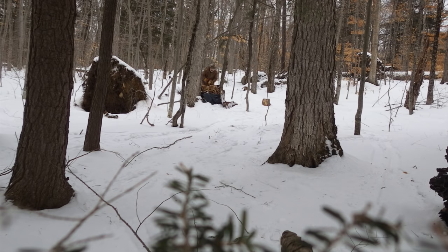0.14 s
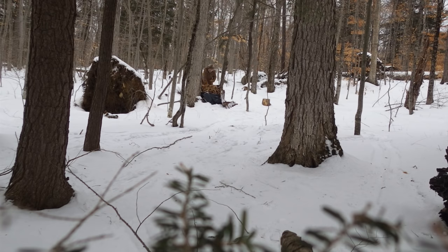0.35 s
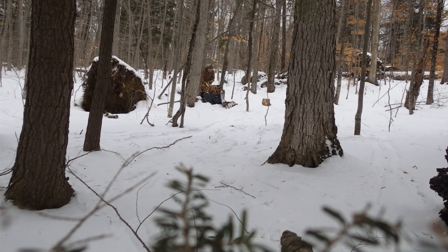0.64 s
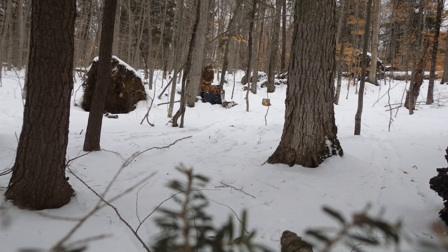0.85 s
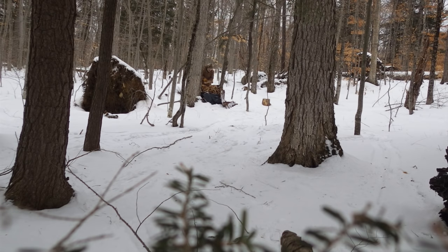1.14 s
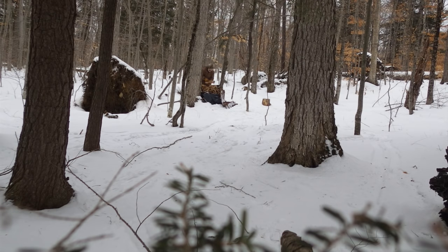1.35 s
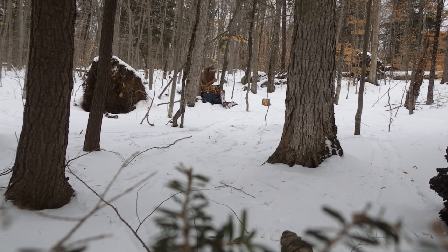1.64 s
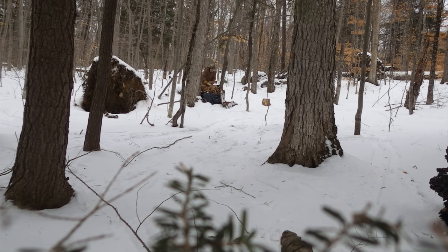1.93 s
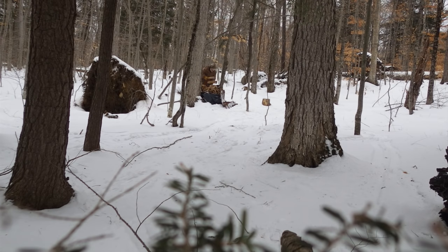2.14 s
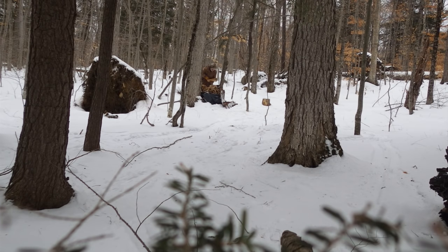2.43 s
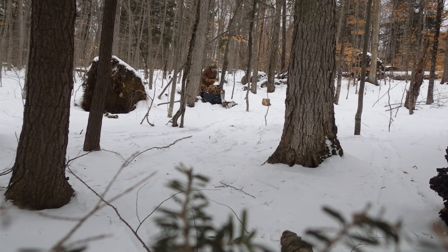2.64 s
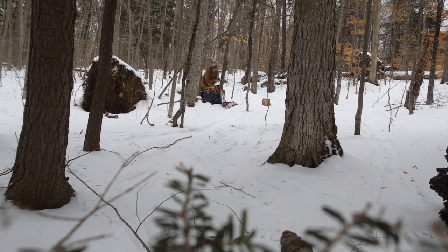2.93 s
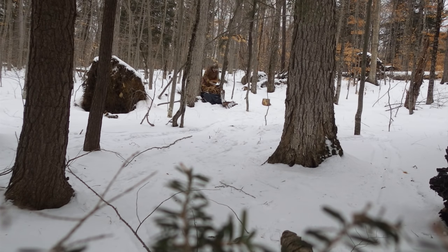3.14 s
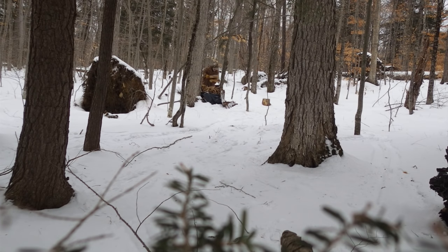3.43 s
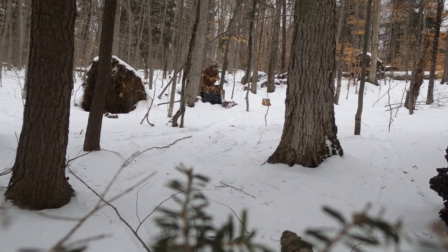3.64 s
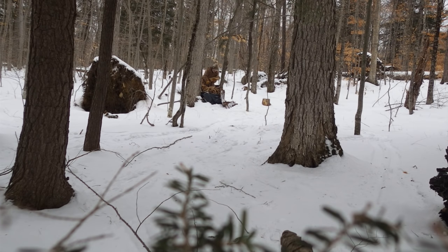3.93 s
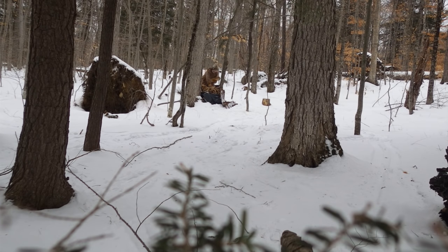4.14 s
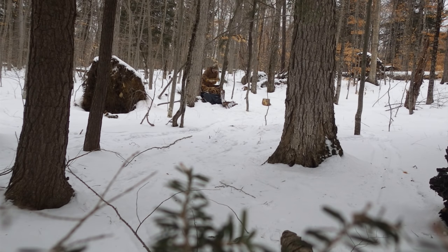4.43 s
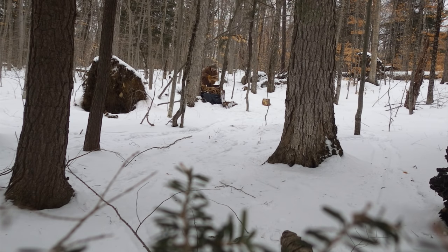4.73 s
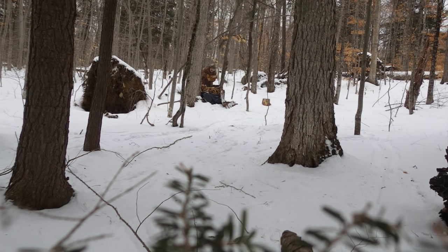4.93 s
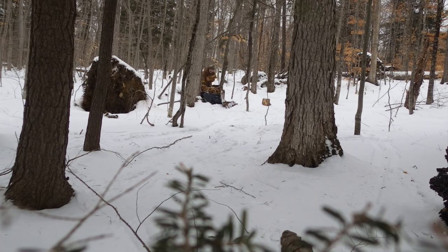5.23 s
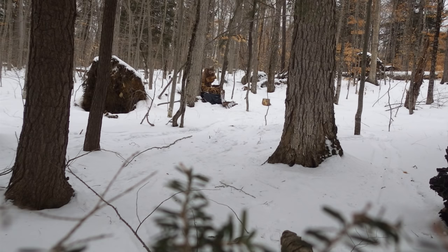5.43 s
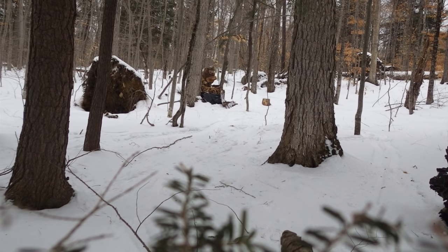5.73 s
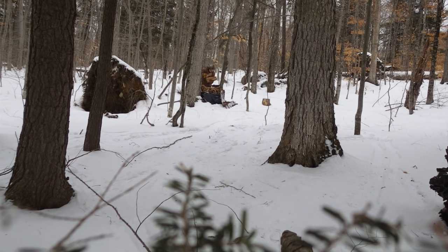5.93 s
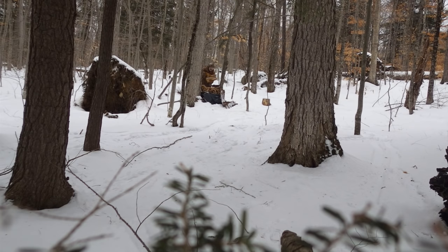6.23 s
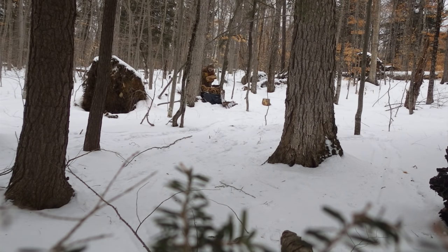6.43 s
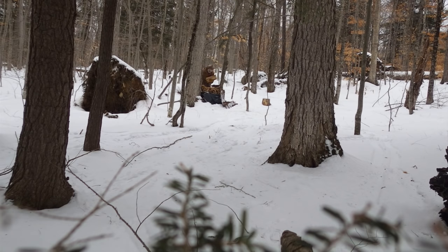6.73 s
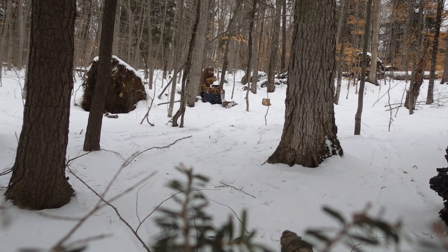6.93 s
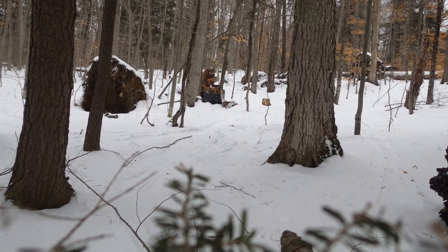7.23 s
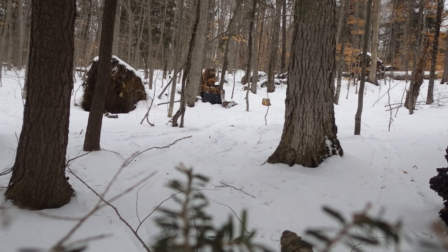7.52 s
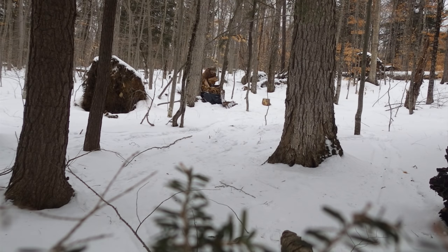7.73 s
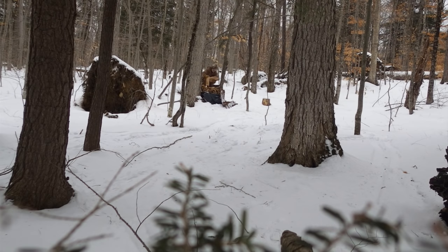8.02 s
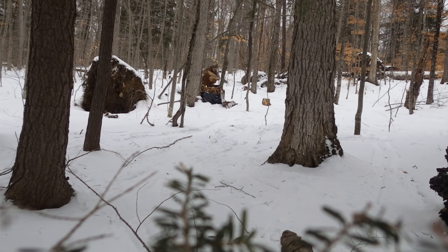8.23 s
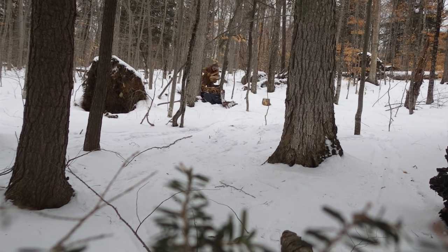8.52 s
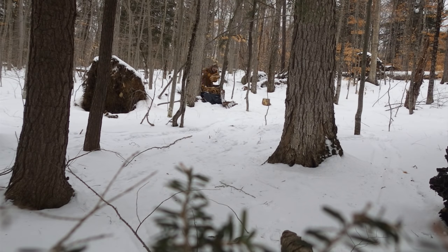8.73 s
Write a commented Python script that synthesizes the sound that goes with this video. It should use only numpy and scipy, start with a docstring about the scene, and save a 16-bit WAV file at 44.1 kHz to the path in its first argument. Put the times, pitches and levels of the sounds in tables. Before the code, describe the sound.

Pieces of split firewood are stacked some way off in a still, snowy wood. They land with irregular knocks and clunks, sometimes singly, sometimes in quick rattling clusters, with soft scrapes and small crunches of bark and snow between. One early clunk is much louder than the rest. Each leaves a thin echo among the trees, over faint air, microphone hiss and a few tiny distant pips.

```python
"""Clunks of split firewood being stacked, some way off in a still, snowy wood.
Each billet rings in two bending modes, rattles the pile and cracks its bark; between blows, logs
scrape and snow crunches. Trunks scatter these sounds into a long thin tail. Behind them: a few far
pips, faint air and the hiss of a microphone with narrow notches."""
import sys
import numpy as np
from scipy import signal
from scipy.fft import rfft, irfft
from scipy.io import wavfile

SR = 44100
rng = np.random.default_rng(int(sys.argv[2]) if len(sys.argv) > 2 else 0)


def output_pcm(signal):
    """Save a mono or channel-first signal as 16-bit PCM at the path in sys.argv[1].

    Samples are clipped to [-1, 1] before scaling.
    """
    pcm = np.clip(np.atleast_2d(signal).T, -1, 1) * 32767
    wavfile.write(sys.argv[1], SR, np.round(pcm).astype(np.int16))


N = 391166
HIT_S = 0.25

# bending modes by billet name, unrelated as a split log is not round: low_hz, high_hz
BILLET_MODES = {"thick": (258, 525), "flat": (717, 1380), "heavy": (765, 1245), "stout": (793, 1362),
                "long": (815, 1382), "medium": (972, 1300), "slim": (920, 1408), "short": (1070, 1406),
                "square": (920, 1120)}
# bark and ice breaking: freq_hz, gain_db
CRACK_SPECTRUM = [(1000, -20), (2800, 0.5), (3800, -7), (5000, 3.5), (6000, 5.5), (7000, -6.5),
                  (9000, -18.5), (12000, -12)]


def stacking():
    """Billets land on the pile and slide home."""
    # start_s, billet, level_db, high_mode_db, crack_db, thud_db, t60_s
    landings = [(0.188, "short", -55.5, -3, -14, -7.5, 0.071), (0.7145, "long", -52.5, 20, -12, -18, 0.13),
                (0.745, "long", -48, 6, -12, -19, .1), (1.1355, "heavy", -35, -0.5, -13.5, -19.5, 0.12),
                (1.3851, "stout", -18.5, 8, -23, -20.5, 0.06), (1.394, "slim", -50, -3, -1, -19, .014),
                (2.102, "short", -50, 20, -20, -30, 0.02), (2.5967, "heavy", -34, -1.5, -20.5, -33, 0.066),
                (2.631, "square", -43, 2, -7, -26, 0.06), (2.652, "heavy", -49.5, -15, 4, -24.5, 0.057),
                (2.752, "square", -51.5, 5, -11, -20, 0.1), (2.79, "square", -55, 10, -18, -24, 0.12),
                (2.848, "short", -64, 9, -17, -21, 0.018), (3.221, "slim", -55.5, 10, -11, -25, .07),
                (3.8707, "long", -46.5, -1, -5, -36, 0.095), (3.9375, "medium", -49, -12, -7.5, -6, .036),
                (3.96, "short", -52, 11, -11, -23, 0.03), (3.984, "short", -35.5, 20, -12.5, -25.5, 0.029),
                (4.369, "long", -54, -24, 3.5, 4, 0.0099), (4.4988, "long", -45, 25, -37, -33, 0.086),
                (5.003, "long", -47.5, -3, -9, 0, 0.13), (5.0358, "heavy", -31, -7, -25, -9.5, 0.02),
                (5.1175, "square", -47, -3, -17.5, -10, 0.05),
                (5.209, "medium", -37.5, -2.5, -20, -12.5, 0.012),
                (5.221, "square", -49, 13, -6, -25, 0.046), (5.8455, "slim", -51, -3, -19, -22, .033),
                (6.041, "heavy", -46, 1.5, -19, -24, 0.092), (6.518, "heavy", -34, -11, -16, -11.5, 0.055),
                (6.5225, "medium", -29, -11, -14.5, -11.5, 0.077),
                (6.5465, "medium", -36, -11, -17, -14.5, 0.083),
                (6.574, "heavy", -40.5, -6, -32, -22, 0.066), (6.6139, "flat", -36, -4, -12, -7.5, .034),
                (6.713, "medium", -54.5, -2, -14, -8, 0.05), (7.651, "slim", -55.5, 15, -8, -13, 0.045),
                (7.671, "medium", -53.5, -1, -5, -11, 0.032), (7.905, "medium", -47.5, 2, -10, -21, 0.054),
                (7.9338, "slim", -43, 4.5, -28.5, -25, 0.027),
                (8.018, "medium", -54.5, -15, -13, -18, .064), (8.114, "square", -44.5, 2, -11, -4.5, .11),
                (8.1155, "thick", -49, -5, -19.5, -11.5, 0.078), (8.789, "slim", -43, 7, -3.5, -13, 0.082),
                (8.8208, "long", -48.5, 0, -9.5, 0, 0.054)]
    track = np.zeros(N)
    for start_s, *blow in landings:
        add(track, start_s, knock(*blow))
    firm_blow_db = -45
    for start_s, _, level_db, *_, t60_s in landings:
        slide_db = -60.5 + 0.45 * (level_db - firm_blow_db)
        slide_s = 1.32 * t60_s  # a loose billet both rings and slides longer
        add(track, start_s, scrape(slide_s, wood_db=slide_db, crunch_db=slide_db - 11))
    return track


def knock(billet, level_db, high_mode_db, crack_db, thud_db, t60_s):
    """The push builds as bark crushes, then wood rings. High mode re low; crack and thud re level_db."""
    low_hz, high_hz = BILLET_MODES[billet]
    t = np.arange(int(HIT_S * SR)) / SR
    # more thud than crack: a softer, longer contact
    contact_s = np.clip(0.001973 * 2 ** ((thud_db - crack_db) / 17.5), 0.0003, 0.006)
    push = 1 - np.exp(-(t / contact_s) ** 2)
    # the pile soaks up most of the ring; a little lives on in the free ends
    free_ends = undb(-24) * fade(t, t60_s=0.067)
    low = push * (fade(t, t60_s) + free_ends) * np.sin(2 * np.pi * low_hz * t)
    high = push * (fade(t, 0.55 * t60_s) + free_ends) * np.sin(2 * np.pi * high_hz * t)
    ring = level(low, 0) + level(high, high_mode_db)
    rattle = push * fade(t, 3 * t60_s) * pile(t)  # a billet held fast damps the pile too
    rattle_db = 4 + 0.56 * crack_db  # rougher contact shakes it more
    # dull push into pile and ground: freq_hz, gain_db
    thud_spectrum = [(30, -26), (120, -12.5), (260, -8.5), (470, 5), (620, 1.5), (900, 5.5), (2000, -45.5)]
    thud = colour(signal.unit_impulse(len(t), int(contact_s * SR)), thud_spectrum)
    snap = (t >= contact_s) * fade(np.abs(t - contact_s), t60_s=0.005) * rng.standard_normal(len(t))
    crumbs = push * fade(t, t60_s) * grit(len(t), spread_db=3.5)
    crack = colour(level(snap, -3) + level(crumbs, 0), CRACK_SPECTRUM)
    return (level(ring, level_db) + level(rattle, level_db + rattle_db)
            + level(thud, level_db + thud_db) + level(crack, level_db + crack_db))


def pile(t):
    """The pile's ring, a little different at each point of contact."""
    # pitch_hz, t60_s, level_db
    modes = [(457, 0.0095, -9), (555, 0.024, -7), (715, 0.035, 2), (837, 0.036, 1), (988, 0.074, -1),
             (1100, 0.021, 5), (1269, 0.022, 7), (1402, 0.02, 6.5), (1740, 0.024, 4), (1905, 0.05, -5),
             (2287, 0.013, 2.5), (2393, 0.063, -14.5), (2840, 0.094, -14.5), (3130, 0.042, -1),
             (3495, 0.049, -14.5)]
    ring = np.zeros(len(t))
    for pitch_hz, t60_s, level_db in modes:
        detune, strength, phase = rng.uniform(-1, 1, 3)
        tone = np.sin(2 * np.pi * pitch_hz * (1 + 0.035 * detune) * t + np.pi * phase)
        ring += undb(level_db + 2.5 * strength) * fade(t, t60_s) * tone
    return ring


def dragging(bumps_per_s=11):
    """Logs drag over bark and snow, bumping their neighbours at uneven intervals."""
    # start_s, length_s, wood_db, crunch_db
    drags = [(0.725, 0.23, -60.5, -64), (1.097, 0.11, -55.5, -80), (1.719, 0.49, -69, -65),
             (2.029, 0.057, -55.5, -75), (3.04, .08, -56, -76), (3.267, 0.025, -59, -68),
             (3.508, 0.022, -62, -59.5), (3.616, 0.39, -83, -66), (3.925, 0.15, -56.5, -61),
             (4.322, 0.038, -55, -58), (4.468, 0.048, -54, -59.5), (5.033, 0.15, -56, -73),
             (5.748, .2, -52, -56), (5.996, 0.1, -57, -62), (6.502, 0.034, -50, -51),
             (7.587, 0.33, -61, -69), (8.04, 0.06, -61, -72), (8.769, 0.092, -51, -76)]
    track = np.zeros(N)
    for start_s, *drag in drags:
        add(track, start_s, scrape(*drag))
    neighbours = [name for name in BILLET_MODES if name != "thick"]
    for start_s, length_s, wood_db, _ in drags:
        count = int(length_s * bumps_per_s)
        for k, (jitter, strength, balance) in enumerate(rng.uniform(-1, 1, (count, 3))):
            progress = (k + 0.5 + jitter / 2) / count
            speed_db = 20 * np.log10(np.sin(np.pi * progress))  # fastest, so hardest, mid-stroke
            bump_db = wood_db + 0.5 + 2 * strength + speed_db
            bump = knock(rng.choice(neighbours), bump_db, high_mode_db=10 * balance,
                         crack_db=-7.5, thud_db=-12.5, t60_s=0.05)
            add(track, start_s + length_s * progress, bump)
    return track


def scrape(length_s, wood_db, crunch_db):
    """Bark catches and slips in small jerks that ring the pile and crunch the snow."""
    t = np.arange(int((length_s + HIT_S) * SR)) / SR
    jerk_times_s = np.arange(0, t[-1], 0.007)
    jerk_db = 3.5 * np.interp(t, jerk_times_s, rng.standard_normal(len(jerk_times_s)))
    arch = np.sqrt(np.abs(np.sin(np.pi * np.minimum(t / length_s, 1))))
    stroke = undb(jerk_db) * arch
    wood = np.zeros(len(t))
    for _ in range(2):  # each end of the log rubs its own part of the pile
        friction = stroke * grit(len(t), spread_db=4)
        wood += signal.fftconvolve(friction, pile(t))[:len(t)]
    crunch = colour(stroke * grit(len(t), spread_db=4.5), CRACK_SPECTRUM)
    return level(wood, wood_db, length_s) + level(crunch, crunch_db, length_s)


def trunk_echo(near_db=-13, near_cutoff_hz=3500, far_db=-18):
    """Impulse response: close trunks answer at once, distant ones in a long, dull, patchy tail."""
    # colour of the distant echo: freq_hz, gain_db
    far_spectrum = [(200, -22), (550, -9), (800, -1), (1030, 1.5), (1380, 0), (1900, 3), (2900, 1),
                    (5000, -14), (10000, -30)]
    t = np.arange(int(1.2 * SR)) / SR
    near = grit(len(t), spread_db=-0.5) * fade(t, t60_s=0.08) * np.clip((t - 0.006) / 0.014, 0, 1)
    far = grit(len(t), spread_db=2.5) * fade(t, t60_s=1.32) * np.clip((t - 0.015) / 0.052, 0, 1)
    lowpass = signal.butter(1, near_cutoff_hz, fs=SR, output="sos")
    near = signal.sosfilt(lowpass, level(near, near_db, 1 / SR))
    return near + colour(level(far, far_db, 1 / SR), far_spectrum)


def far_pips():
    """Faint, nearly pure notes: sines under half-sine envelopes."""
    # start_s, pitch_hz, length_s, level_db
    notes = [(1.792, 2370, 0.036, -62), (3.811, 2390, 0.067, -64.5), (4.65, 2400, 0.0095, -56.5),
             (6.264, 2405, 0.056, -62.5), (6.931, 665, 0.034, -57.5)]
    track = np.zeros(N)
    for start_s, pitch_hz, length_s, level_db in notes:
        t = np.arange(int(length_s * SR)) / SR
        pip = np.sin(np.pi * t / length_s) * np.sin(2 * np.pi * pitch_hz * t)
        add(track, start_s, level(pip, level_db, length_s))
    return track


def air_and_hiss():
    """Steady noise: low air nearly alike in both ears, microphone hiss wider."""
    # freq_hz, density_db_per_hz
    mid_spectrum = [(20, -106), (50, -102), (90, -93.5), (140, -89.5), (280, -89), (550, -91.5),
                    (1300, -94.5), (1900, -103), (2250, -99), (2410, -94.5), (2650, -99), (4500, -99.5),
                    (6500, -95), (11500, -95.5)]
    # stereo width: freq_hz, side_minus_mid_db
    width = [(30, -18), (120, -10.5), (1300, -10.5), (1900, -18.5), (2400, -9.5), (3000, -6), (6000, -4.5),
             (12000, -5.5)]
    mid, side = rfft(rng.standard_normal((2, N))) * gains(mid_spectrum, N) * np.sqrt(SR / 2)
    side *= gains(width, N)
    return irfft(np.array([mid + side, mid - side]), N)


def grit(size, spread_db):
    """Dense tiny contacts of unequal strength."""
    return rng.standard_normal(size) * undb(spread_db * np.minimum(rng.exponential(size=size), 6))


def undb(db):
    """Decibels to gain."""
    return 10 ** (np.asarray(db) / 20)


def fade(t, t60_s):
    """Exponential decay, 60 dB down at t60_s."""
    return np.exp(-np.log(1000) * t / max(t60_s, 1e-3))


def level(x, rms_db, length_s=0.02):
    """Give x the energy of a sound of this level and length."""
    return x * undb(rms_db) * np.sqrt(length_s * SR / (np.sum(x ** 2) + 1e-18))


def add(track, start_s, x):
    """Mix x into the track at start_s."""
    i = int(np.clip(start_s * SR, 0, N - 1))
    track[i:i + len(x)] += x[:N - i]


def gains(spectrum, size):
    """Gain per FFT bin from rows of freq_hz, gain_db."""
    freq_hz, gain_db = np.transpose(spectrum)
    bin_hz = np.maximum(np.fft.rfftfreq(size, 1 / SR), 1)
    return undb(np.interp(np.log(bin_hz), np.log(freq_hz), gain_db))


def colour(x, spectrum, size=1024):
    """Minimum-phase filter: attacks stay sharp."""
    cepstrum = irfft(np.log(gains(spectrum, size)))
    cepstrum[1:size // 2] *= 2
    cepstrum[size // 2 + 1:] = 0
    response = irfft(np.exp(rfft(cepstrum)))
    return signal.fftconvolve(x, response)[:len(x)]


def scene():
    """The woodpile a hair right of centre, widened by its echo, over pips, air and hiss."""
    mid_echo, side_echo = trunk_echo(), trunk_echo()
    background = air_and_hiss()
    wood = stacking() + dragging()
    mid = wood + signal.fftconvolve(wood, mid_echo)[:N] + far_pips()
    side = undb(-35) * mid + undb(-22) * signal.fftconvolve(wood, side_echo)[:N]
    return np.array([mid - side, mid + side]) + background


def record(dry):
    """The recorder cuts narrow notches and the top treble."""
    # centre_hz, width_hz
    notches = [(1600, 106), (2090, 212), (3180, 470), (4180, 566), (7880, 220)]
    for centre_hz, width_hz in notches:
        band_hz = [centre_hz - width_hz / 2, centre_hz + width_hz / 2]
        dry = signal.sosfilt(signal.butter(2, band_hz, "bandstop", fs=SR, output="sos"), dry)
    cutoff_hz = 11900
    return signal.sosfilt(signal.ellip(10, 0.2, 70, cutoff_hz, fs=SR, output="sos"), dry)


dry = scene()
out = record(dry)
output_pcm(out)
```